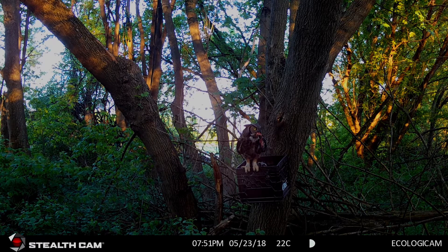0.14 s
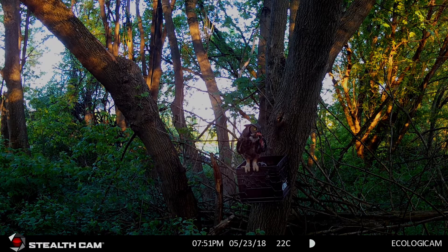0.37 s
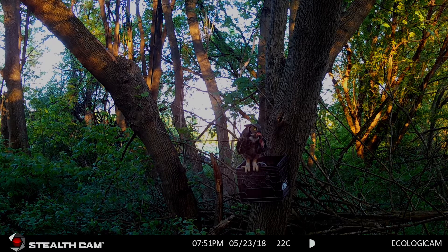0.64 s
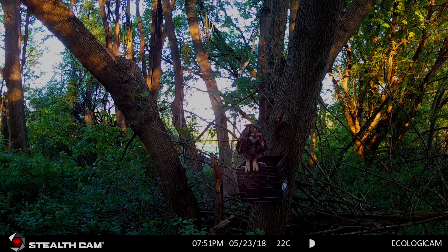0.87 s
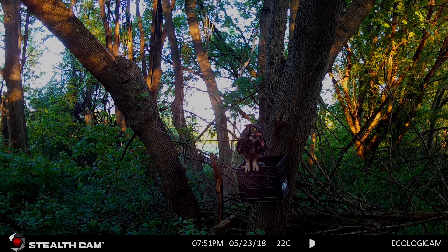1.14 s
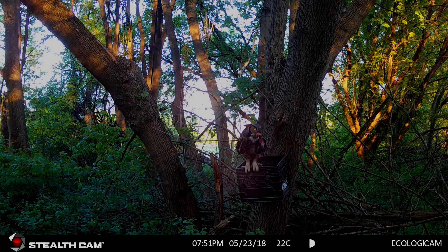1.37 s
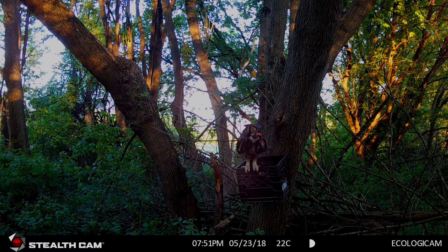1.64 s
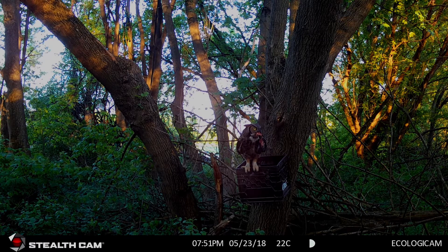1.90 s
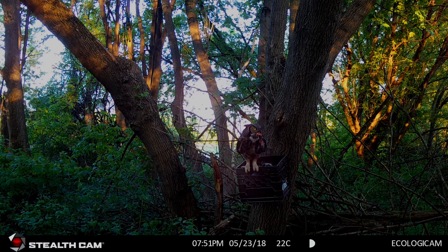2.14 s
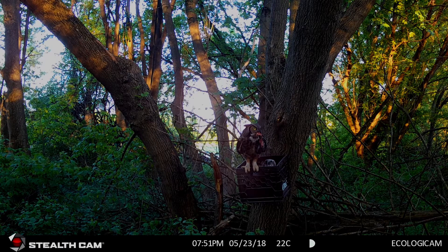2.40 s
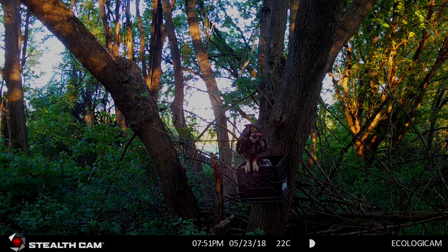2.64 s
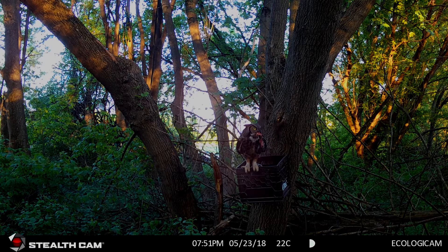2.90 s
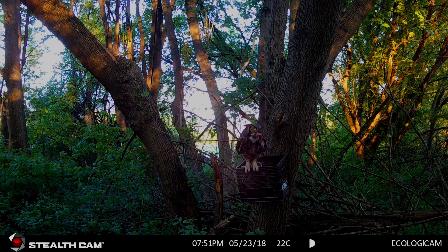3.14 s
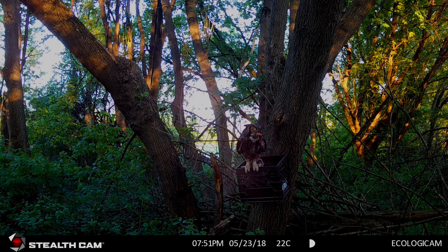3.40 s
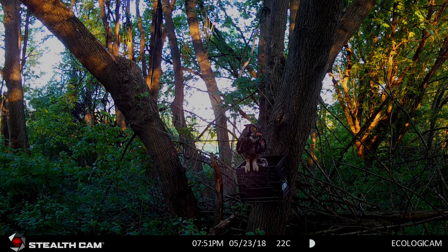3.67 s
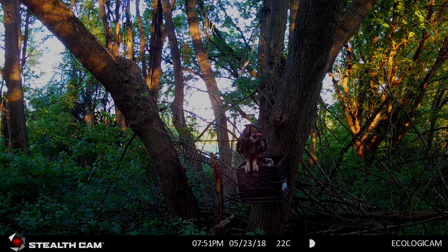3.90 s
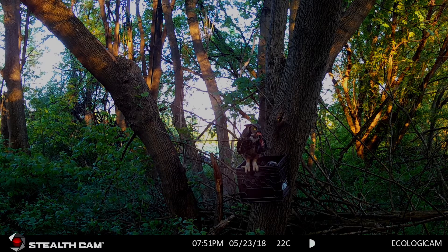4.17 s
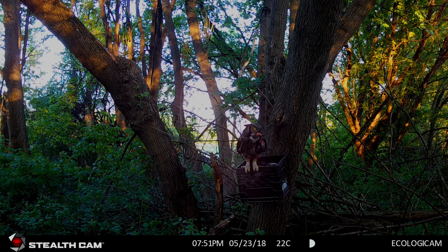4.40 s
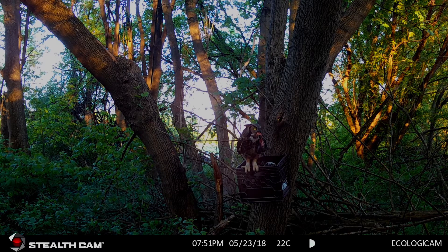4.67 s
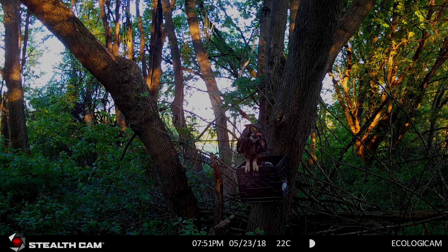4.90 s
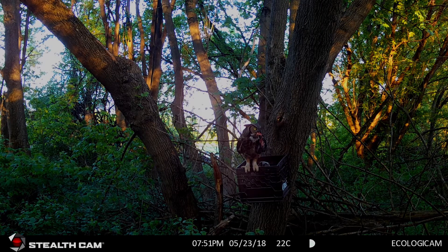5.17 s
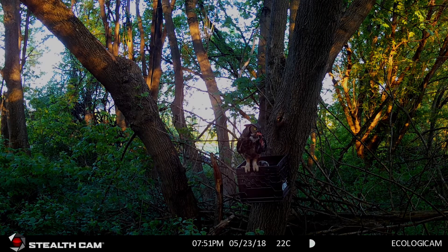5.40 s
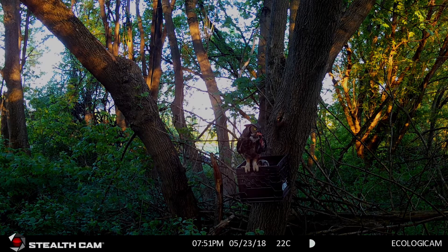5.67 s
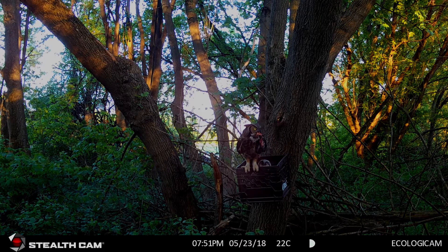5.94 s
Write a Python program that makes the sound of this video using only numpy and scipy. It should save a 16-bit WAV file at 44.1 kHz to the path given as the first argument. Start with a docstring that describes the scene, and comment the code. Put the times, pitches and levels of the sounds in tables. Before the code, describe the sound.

A nearby bird repeats quick whistle-and-chip calls while tree frogs trill, distant frogs purr steadily, and other birds twitter and wheeze near the end.

```python
"""A near bird's soft whistle and a tree frog's trill come first, then the bird's rising chip and falling stroke.
It is evening in a wood. The bird is swept tones, doubled by the ground; birds further off whistle, twitter
and wheeze on noisy partials. Tree frogs trill in pulse trains over a distant chorus, and a low voice croaks
now and then, its pulses ringing a body. Trunks scatter every voice into a tail; a small microphone adds
hiss, rumble and a faint whine."""
import sys
import numpy as np
from scipy import signal
from scipy.fft import rfft, irfft
from scipy.io import wavfile
from scipy.ndimage import uniform_filter1d

SR = 44100
rng = np.random.default_rng(int(sys.argv[2]) if len(sys.argv) > 2 else 0)


def convert_level_to_amplitude(level_db):
    """Map a level in decibels to its linear amplitude factor."""
    exponent = np.asarray(level_db, float) / 20
    return 10 ** exponent


def file_out(sig):
    """Save sig as 16-bit WAV at sys.argv[1]."""
    # one column per channel
    cols = np.atleast_2d(sig).T
    # limit, then scale
    lim = np.clip(cols, -1, 1)
    pcm = np.round(lim * 32767).astype(np.int16)
    wavfile.write(sys.argv[1], SR, pcm)


N = 266805
T = np.arange(N) / SR


def add(out, s, sound):
    """Mix a short sound in at s seconds."""
    i = max(int(s * SR), 0)
    out[i:i + len(sound)] += sound[:N - i]


def unit(x):
    """Scale to rms 1."""
    return x / np.sqrt(np.mean(x ** 2))


def walk(rate, size):
    """Smooth random wander, about rate turns a second, rms 1."""
    k = max(int(SR / rate), 1)
    smooth = uniform_filter1d(rng.standard_normal(size), k)
    return unit(uniform_filter1d(smooth, k))


def tone(hz, gain, octave_db):
    """Near-sine voice with a faint octave."""
    phase = 2 * np.pi * np.cumsum(hz) / SR
    return gain * (np.sin(phase) + convert_level_to_amplitude(octave_db) * np.sin(2 * phase))


def trunks(x, t60, wet_db, edge_s=0.09):
    """Scatter from the trunks: uneven echoes that thin out sharply beyond the edge of the clearing."""
    t = np.arange(SR // 2) / SR
    clumps = convert_level_to_amplitude(3.5 * walk(200, len(t)))
    decay = np.exp(-np.log(1000) * t / t60)
    onset = np.minimum(t / .015, 1)
    beyond_edge = np.where(t < edge_s, 1, .4)
    tail = rng.standard_normal(len(t)) * clumps * decay * onset * beyond_edge
    return x + convert_level_to_amplitude(wet_db) * signal.fftconvolve(x, tail / np.linalg.norm(tail))[:N]


# air and microphone noise: (frequency [Hz], level in a 10 Hz band [dB])
NOISE_FLOOR = [(20, -66.5), (50, -64.5), (120, -72.5), (300, -74.5), (550, -73.5), (720, -81.5),
               (1400, -87), (2800, -91.5), (4000, -94.5), (7000, -99.5), (15000, -100)]
# steady whine at the microphone: (frequency [Hz], rms level [dB])
WHINE = [(13690, -95)]


def microphone_floor():
    """Smooth hiss and rumble with a faint steady whine; the noise breathes slightly."""
    hz, db = np.transpose(NOISE_FLOOR)
    f = np.maximum(np.arange(N // 2 + 1) * SR / N, 1)
    colour = convert_level_to_amplitude(np.interp(np.log(f), np.log(hz), db)) * np.sqrt(SR / 20)
    hiss = irfft(rfft(rng.standard_normal(N)) * colour, N)
    whine = sum(convert_level_to_amplitude(db) * np.sqrt(2) * np.sin(2 * np.pi * hz * T) for hz, db in WHINE)
    return hiss * convert_level_to_amplitude(.75 * walk(14, N)) + whine


def frog_pulse(hz, ms, glide_hz):
    """One frog pulse: a short tone that swells, fades and slides up."""
    u = np.linspace(0, 1, int(ms * SR / 1000))
    phase = 2 * np.pi * np.cumsum(hz + glide_hz * (u - .5)) / SR
    return np.sin(np.pi * u) ** 1.72 * np.sin(phase)


# distant frogs over time: (time [s], low voices' level [dB], high voices' level [dB])
CHORUS = [(0.0, -52.5, -57), (0.29, -57.5, -61), (0.55, -57, -61.5), (0.93, -57, -65), (1.21, -55.5, -55),
          (1.48, -57.5, -58.5), (2.2, -55, -58), (2.42, -60.5, -68), (2.9, -56, -60.5), (3.27, -53, -49),
          (3.61, -55, -60), (4.03, -54, -52), (4.23, -59.5, -63.5), (4.8, -57, -54.5), (5.34, -56.5, -59.5),
          (6.05, -56, -52.5)]
# low and high voices: (centre [Hz], spread [Hz])
CHORUS_BANDS = [(1040, 97.5), (2120, 223)]


def chorus():
    """A dozen far frogs in each band, each pulsing at its own pitch and rate and drifting in level."""
    s, *levels = np.transpose(CHORUS)
    out = 0
    for (hz, spread), db in zip(CHORUS_BANDS, levels):
        band = 0
        for place in np.linspace(-1.6, 1.6, 12):  # position in the band, in spreads
            pulses_per_s = 19.5 + 1.5 * rng.standard_normal()
            count = np.floor(rng.random() + T * pulses_per_s + .12 * walk(8, N))
            beats = np.maximum(np.diff(count, prepend=0), 0)
            gain = convert_level_to_amplitude(1.85 * walk(1.0, N)) * np.exp(-place ** 2 / 3)
            pulse = frog_pulse(hz + spread * place, ms=19.3, glide_hz=140.0)
            band = band + signal.fftconvolve(beats * gain, pulse)[:N]
        out = out + convert_level_to_amplitude(np.interp(T, s, db)) * unit(trunks(band, t60=1.0, wet_db=9.5))
    return out


# low croaks: (time [s], level [dB], length [ms])
CROAKS = [(0.108, -39.5, 32), (0.46, -40.5, 27), (.84, -42.5, 50), (1.99, -43, 63), (2.626, -41, 32),
          (3.332, -46, 51), (4.071, -44.5, 27), (5.46, -42.5, 54)]
# resonances of the croaker's body: (frequency [Hz], width [Hz], level [dB])
CROAK_BODY = [(345, 35, 0), (570, 40, -3), (210, 50, -6)]


def croaks():
    """Uneven throat pulses ring a low body."""
    pulses, rate = np.zeros(N), 122  # pulses per second
    for s, db, ms in CROAKS:
        chance = rng.standard_normal((20, 2))
        total = rate * ms / 1000
        for k, u in enumerate(np.arange(.5, total)):
            size = convert_level_to_amplitude(db + 2.5 * chance[k, 0]) * np.sin(np.pi * u / total) ** .5
            pulses[int((s + (u + .06 * chance[k, 1]) / rate) * SR)] += size
    t = T[:SR // 20]
    body = sum(convert_level_to_amplitude(db) * np.exp(-np.pi * width * t) * np.sin(2 * np.pi * hz * t)
               for hz, width, db in CROAK_BODY)
    body = body * np.minimum(t / .006, 1)  # soft throat pulses, no click
    return signal.fftconvolve(pulses, body)[:N]


# tree frog trills: (first pulse [s], last pulse before [s], rate [pulses/s], pitch [Hz], level [dB])
TRILLS = [(.013, .44, 21.4, 2216, -37.5), (.136, .62, 19.2, 1047, -45.5), (0.077, .62, 19.05, 1680, -50.5),
          (.765, 1.2, 20.8, 1853, -51.5), (.921, 1.19, 19.8, 2274, -47.5), (0.685, 1.2, 18.5, 1074, -46.5),
          (3.056, 3.5, 16.7, 1070, -47), (3.685, 4.0, 20.0, 1079, -46), (3.887, 4.16, 15.4, 2315, -37.5),
          (4.672, 5.3, 21.8, 2234, -43.5), (5.341, 5.56, 19.0, 2240, -37), (5.36, 5.56, 21.0, 2246, -40.5)]
# how far a trill pulse slides up: (voice [Hz], slide [Hz])
FROG_SLIDE = [(1050, 190), (1700, 400), (2200, 120)]


def tree_frogs():
    """Even pulse trains that swell at the start and vary a little from pulse to pulse."""
    out = np.zeros(N)
    for first, last, rate, hz, db in TRILLS:
        chance = rng.standard_normal((30, 2))
        slide_hz = np.interp(hz, *np.transpose(FROG_SLIDE))
        for k, s in enumerate(np.arange(first, last, 1 / rate)):
            swell_db = -5.0 * np.exp(-k / 2.5) + 1.5 * chance[k, 0]
            pulse = frog_pulse(hz * (1 + 0.011 * chance[k, 1]), ms=20.0, glide_hz=slide_hz)
            add(out, s - .009, convert_level_to_amplitude(db + swell_db) * pulse)
    return out


# wheezes further off, one list each: (time [s], pitch [Hz], level [dB])
WHEEZES = [
    [(1.23, 682, -80), (1.26, 678, -58), (1.31, 678, -61.5), (1.36, 686, -69)],
    [(1.29, 766, -64), (1.35, 755, -57.5), (1.45, 727, -52), (1.55, 699, -50), (1.61, 697, -48),
     (1.64, 636, -82)],
    [(4.99, 714, -67), (5.02, 709, -50.5), (5.17, 704.7, -44), (5.25, 719, -46.5), (5.33, 697, -47.5),
     (5.38, 736, -71)],
]
# their partials: (multiple of the pitch, added level at the start [dB], added level at the end [dB])
PARTIALS = [
    [(4, -1, -8), (5, -11, -11), (6, -13, 0), (7, 4.5, -3), (9, -15, -17)],
    [(3.5, -6, -18), (4, -10.5, 4.5), (5, -34, -10), (6, -22, -9), (7, -10.5, -9.5), (8, -11, -35)],
    [(3.5, -25, -1), (4, 0, -6.5), (4.5, -44, -3), (5, -1.5, -9), (6, -2, -0.5), (7, -3, -7.5),
     (8, -27, -20)],
]


def wheezes(jitter, rough):
    """A harsh buzz: the pitch shakes fast and every partial is broken up by its own breath noise."""
    out = np.zeros(N)
    for table, partials in zip(WHEEZES, PARTIALS):
        s, *columns = np.transpose(table)
        t = np.arange(s[0], s[-1], 1 / SR)
        hz, db = (np.interp(t, s, c) for c in columns)
        phase = 2 * np.pi * np.cumsum(hz * (1 + jitter * walk(160, len(t)))) / SR
        for k, first_db, last_db in partials:
            voiced = (1 + rough * walk(190, len(t))) * np.sin(k * phase)
            breath = rough * walk(420, len(t)) * np.cos(k * phase)
            level = convert_level_to_amplitude(db + np.linspace(first_db, last_db, len(t)))
            add(out, s[0], level * (voiced + breath))
    return out


def whistles(table, waver_db):
    """Notes whose pitch bends along a parabola and whose strength wavers."""
    out = np.zeros(N)
    for s, ms, start, middle, end, db in table:
        u = np.linspace(0, 1, int(ms * SR / 1000))
        hz = start + (4 * middle - 3 * start - end) * u + 2 * (start + end - 2 * middle) * u ** 2
        hoarse = min(.15 + (middle / 6200) ** 7, 1.3)  # the highest notes are hoarse
        breath = 1 + hoarse * walk(400, len(u))
        add(out, s, tone(hz, breath * convert_level_to_amplitude(db) * np.sin(np.pi * u) ** .8, octave_db=-42))
    return out * convert_level_to_amplitude(waver_db * walk(180, N))


# a bird that sings two close tones at once: (time [s], lower tone [Hz], lower tone's level [dB])
PAIRS = [(4.544, 3490, -61), (4.86, 3530, -62), (5.39, 3490, -54), (5.505, 3460, -52), (5.619, 3430, -49),
         (5.735, 3530, -44.5), (5.84, 3454, -47)]


def two_tone_bird(ratio, repeat_ms, repeat_db):
    """Both halves of the syrinx sound, each sagging a little; every pair sounds again softly a little later."""
    length_ms, upper_db = 39, -62.5
    rows = []
    for s, hz, low_db in PAIRS:
        for f, db in ((hz, low_db), (ratio * hz, upper_db)):
            for late_ms, soft_db in ((0, 0), (repeat_ms, repeat_db)):
                rows.append((s + late_ms / 1000, length_ms, f, f, .992 * f, db + soft_db))
    return whistles(rows, waver_db=2.5)


def glide(s, ms, start_hz, end_hz, db):
    """A straight glide as a whistle row."""
    return s, ms, start_hz, (start_hz + end_hz) / 2, end_hz, db


# nearly level chips of a second bird; the faint one at 3.015 s is an echo of the chip before it:
# (time [s], length [ms], middle pitch [Hz], level [dB])
TUKS = [(2.305, 7, 2370, -21), (2.313, 15, 2463, -22.5), (2.995, 6.9, 2410, -25),
        (3.001, 13.6, 2336, -21.5), (3.015, 5.7, 2420, -45), (5.695, 21, 2215, -39.5)]
# gliding whistles of other birds; the rows at 3.647 and 3.703 s are the near bird's fall and
# echoes of its chip: (time [s], length [ms], start [Hz], end [Hz], level [dB])
NOTES = [(1.218, 28, 2110, 2640, -41), (1.70, 30, 2507, 2230, -50.5), (2.235, 74, 2420, 2225, -41),
         (2.26, 43, 2830, 2940, -48), (2.671, 58, 1820, 1810, -61.5), (2.745, 55, 3080, 2370, -62),
         (2.782, 78, 2354, 2450, -46.5), (2.855, 93, 2580, 3560, -52), (3.42, 50, 2216, 2530, -46),
         (3.647, 15, 2280, 1480, -50), (3.703, 12, 3310, 3450, -41), (3.703, 17, 1920, 1440, -48),
         (5.80, 70, 2900, 3020, -59), (5.92, 46, 2960, 2995, -53), (5.945, 76, 6050, 6050, -56),
         (5.94, 53, 6900, 6300, -54), (5.96, 50, 5040, 4550, -49)]
# whistle that closes a wheeze, arching slightly, then dropping:
# (time [s], length [ms], start and middle [Hz], end [Hz], level [dB])
DROPS = [(1.604, 24.7, 3100, 2510, -36.5), (5.325, 50, 3465, 2510, -34)]
# phrases of the high twittering bird: (time [s], hold length [ms], level [dB], answer level [dB])
TWITTERS = [(5.371, 39, -44, -68), (5.60, 60, -48.5, -62.5), (5.822, 82, -42.5, -54)]


def other_birds():
    """Chips, glides, closing drops and the three-part twitter, with a few echoes, all as bent whistles."""
    tuk_rise_hz = 60
    rows = [glide(s, ms, hz - tuk_rise_hz / 2, hz + tuk_rise_hz / 2, db) for s, ms, hz, db in TUKS]
    rows += [glide(*note) for note in NOTES]
    rows += [(s, ms, a, a, b, db) for s, ms, a, b, db in DROPS]
    for s, hold_ms, db, answer_db in TWITTERS:
        rows.append(glide(s, 43, 4650, 5000, db - 9.5))  # slide up
        rows.append(glide(s + .015, hold_ms, 5140, 5285, db))  # held note
        rows.append(glide(s + .095, 47, 6540, 6050, answer_db))  # hoarse falling answer
    return whistles(rows, waver_db=2.5)


def stroke(shape, ratio):
    """One fast sweep of the syrinx."""
    ms, hz, db = np.transpose(shape)
    t = np.arange(ms[0], ms[-1], 1000 / SR)  # ms
    edge = np.minimum(np.minimum(t - ms[0], ms[-1] - t) / 2.5, 1)
    edge = edge * (1 + .3 * walk(500, len(t)))  # a slightly gritty voice
    return tone(ratio * np.interp(t, ms, hz), edge * convert_level_to_amplitude(np.interp(t, ms, db)), octave_db=-38)


# the two strokes of a chip, before its ratio and levels: (time [ms], pitch [Hz], added level [dB])
RISE = [(0, 2323, -18), (3, 2388, -9), (6.5, 2658, -1), (9, 2670, -4.5), (11, 3010, -33), (14, 3420, -29.5),
        (20, 3320, -18.5)]
FALL = [(-4.5, 3360, -18), (-4.5, 3120, -21.5), (0.5, 2830, -6.5), (2.5, 2450, 3.5), (11.5, 2230, -15),
        (16.5, 1000, -29)]
# chips of the near bird: (time [s], rise level [dB], pitch ratio, fall delay [ms], fall level [dB])
CHIPS = [(0.05, -28.5, 1.034, 30, -51), (0.385, -19.5, 1, 41, -36.5), (0.801, -18, 0.99, 29, -29),
         (2.579, -21.5, 1, 25, -64), (2.911, -18.5, 1, 29, -21.5), (3.266, -18.5, 1.034, 30, -28),
         (3.617, -17.5, 0.989, 23, -40.5), (3.997, -18, 0.99, 18.8, -25.5), (5.728, -15.5, 0.98, 27, -60),
         (5.997, -19, 0.97, 18.5, -35)]
# soft whistles, each lasting until its chip: (time [s], top [Hz], height of the arch [Hz], level [dB])
LEADS = [(0.014, 2937, 230, -44), (.340, 2930, 240, -39), (0.754, 2946, 400, -37), (2.535, 2740, 10, -35.5),
         (2.869, 2727, 10, -38.5), (3.224, 2930, 110, -39.5), (3.57, 2955, 243, -38.5),
         (3.950, 2958, 210, -36.5), (5.692, 2900, 10, -49), (5.960, 2910, 10, -43)]
# echoes off the ground, then the far trees: (delay [ms]) and (level [dB])
ECHO_MS = [5.3, 88]
ECHO_DB = [-1, -24]


def near_bird():
    """Whistle, rise and fall; the ground repeats each a few ms later and the two interfere."""
    leads = []
    for (s, top_hz, arch_hz, db), chip in zip(LEADS, CHIPS):
        ms = 1000 * (chip[0] - s) + 1.9  # overlaps the chip slightly
        leads.append((s, ms, top_hz - arch_hz, top_hz, top_hz - arch_hz, db))
    out = whistles(leads, waver_db=4.)
    for s, rise_db, ratio, fall_ms, fall_db in CHIPS:
        add(out, s, convert_level_to_amplitude(rise_db) * stroke(RISE, ratio))
        add(out, s + (fall_ms + FALL[0][0]) / 1000, convert_level_to_amplitude(fall_db) * stroke(FALL, ratio))
    echoes = sum(convert_level_to_amplitude(db) * np.roll(out, int(ms * SR / 1000)) * (T > ms / 1000)
                 for ms, db in zip(ECHO_MS, ECHO_DB))
    return out + echoes


def scene():
    """Near voices are drier than far ones."""
    floor = microphone_floor()
    frogs = trunks(tree_frogs() + croaks(), t60=0.22, wet_db=-5.5)
    voices = other_birds() + two_tone_bird(ratio=1.1, repeat_ms=68.0, repeat_db=-9.0)
    voices = voices + wheezes(jitter=.007, rough=.9)
    far = trunks(voices, t60=0.22, wet_db=-8.5)
    near = trunks(near_bird(), t60=0.36, wet_db=-11.5)
    return (floor + chorus() + frogs + far + near)[None]


def roll_off(x):
    """The treble ends steeply here."""
    return signal.sosfilt(signal.butter(12, 15780, fs=SR, output="sos"), x)


def record(dry):
    """The recorder cuts the top with a steep low-pass at 15750 Hz."""
    low_pass = signal.ellip(10, .2, 70, 15750, fs=SR, output="sos")
    mix = signal.sosfilt(low_pass, dry)
    return roll_off(mix)


dry = scene()
out = record(dry)
file_out(out)
```